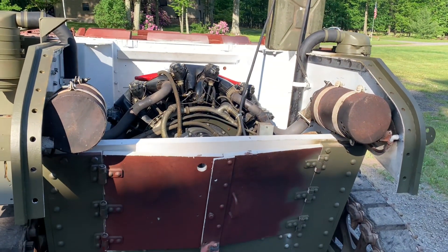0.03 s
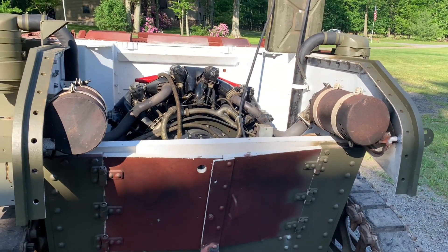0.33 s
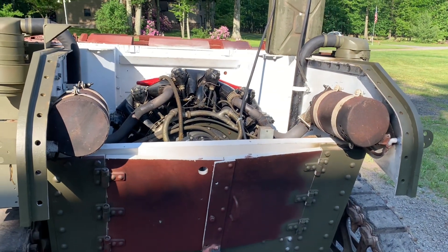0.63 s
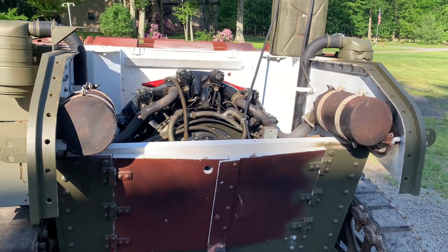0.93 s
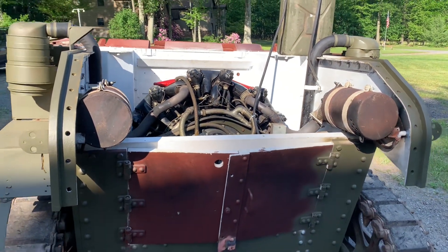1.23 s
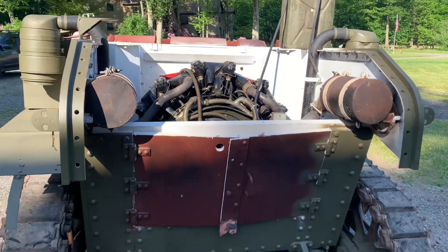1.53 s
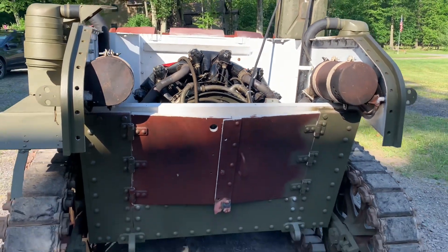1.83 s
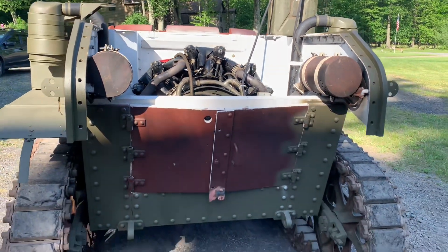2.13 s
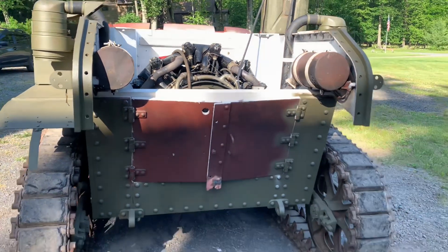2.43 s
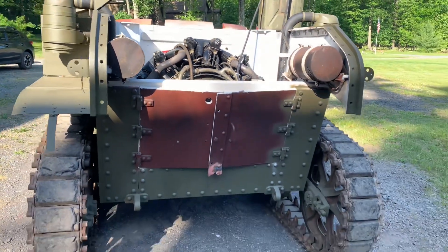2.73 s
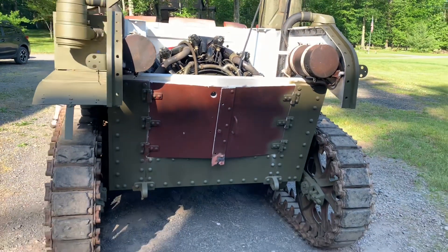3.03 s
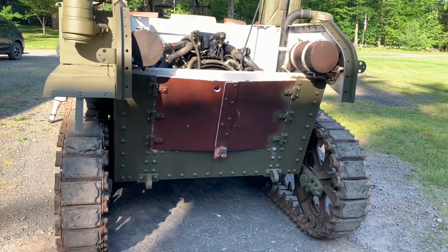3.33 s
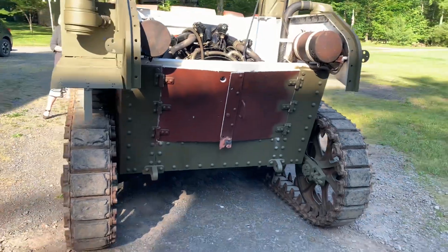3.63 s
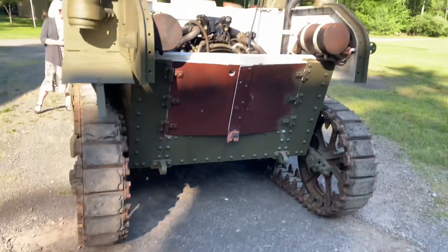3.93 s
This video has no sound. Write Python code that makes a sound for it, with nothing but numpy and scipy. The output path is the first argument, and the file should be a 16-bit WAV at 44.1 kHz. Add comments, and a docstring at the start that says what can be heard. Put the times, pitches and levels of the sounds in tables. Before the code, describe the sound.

A tank engine idles outdoors for four seconds, with a low, loping exhaust thump, a gassy rasp and hissing, ticking valves. Loose metal clinks and pings lightly throughout. At about 1.1 seconds the idle drops slightly, then holds steady. A few sharp little snaps come between 1 and 2.8 seconds. As the microphone backs away over gravel, the rasp and ticking soften while the low throb stays strong.

```python
"""A loping thump and bark of unequal exhaust pulses: a tank's seven-cylinder radial engine idles in its bay.
Gas rasps after each firing, the valve gear ticks, hisses and snaps, loose metal clinks and pings.
The idle drops after a second. The listener backs slowly away over gravel, so the bounce off the ground
trails the direct sound less and less and shifts the colour."""
import sys
import numpy as np
from scipy import signal
from scipy.fft import rfft, irfft
from scipy.io import wavfile
from scipy.ndimage import uniform_filter1d, minimum_filter1d, map_coordinates

SR = 44100
rng = np.random.default_rng(int(sys.argv[2]) if len(sys.argv) > 2 else 0)


def store_wav(level_fs):
    """Save 16-bit WAV to argv[1]."""
    pcm = np.round(np.clip(np.atleast_2d(level_fs), -1, 1) * 32767)
    wavfile.write(sys.argv[1], SR, pcm.T.astype(np.int16))


N = 176400
TIME = np.arange(N) / SR


def undb(db):
    """Decibels to gain."""
    return 10 ** (np.asarray(db) / 20)


def unit(x):
    """Scale to rms 1."""
    return x / np.sqrt(np.mean(x ** 2))


def curve(table, column=1):
    """One column of a time table as an automation curve."""
    rows = np.array(table, float)
    return np.interp(TIME, rows[:, 0], rows[:, column])


def colour(x, points):
    """Minimum-phase EQ through (frequency [Hz], gain [dB]) points."""
    rows, size = np.array(points, float), 2 * N
    hz = np.maximum(np.arange(N + 1) * SR / size, 1)
    db = np.interp(np.log(hz), np.log(rows[:, 0]), rows[:, 1])
    cepstrum = irfft(np.log(undb(db)))
    cepstrum[1:N] *= 2
    cepstrum[N + 1:] = 0
    return irfft(rfft(x, size) * np.exp(rfft(cepstrum)))[..., :N]


def band_unit(x, lo_hz, hi_hz):
    """Scale so that the centre of the stereo image has rms 1 within a band."""
    band = signal.butter(4, [lo_hz, hi_hz], "band", fs=SR, output="sos")
    return x / np.std(signal.sosfilt(band, x.mean(axis=0)))


def ring(x, hz, width_hz, skirt_hz):
    """A narrow resonance, its skirts trimmed by a wider one; gain 1 at the centre."""
    for width in (width_hz, skirt_hz):
        x = signal.lfilter(*signal.iirpeak(hz, hz / width, fs=SR), x)
    return x


def decay(x, seconds):
    """Give every impulse an exponential tail."""
    return signal.lfilter([1], [1, -np.exp(-1 / (seconds * SR))], x)


def delay(x, ms):
    """Delay by a fixed or moving time."""
    return map_coordinates(x, [np.arange(N) - ms * SR / 1000], order=3, mode="mirror")


def place(x, lead_ms, pan_db):
    """Pan by time and level; positive values pull left."""
    return np.array([x * undb(pan_db / 2), delay(x, lead_ms) * undb(-pan_db / 2)])


def flicker(per_s, depth_db):
    """A gain that wavers at random around 1."""
    hold = int(SR / per_s)
    steps = np.repeat(rng.standard_normal(N // hold + 2), hold)
    return undb(depth_db * unit(uniform_filter1d(steps, hold)[:N]))


def impulses(times, sizes):
    """Impulses shared between neighbouring samples."""
    keep = (times > 0) & (times < (N - 2) / SR)
    at, sizes = times[keep] * SR, sizes[keep]
    i = at.astype(int)
    return np.bincount(i, sizes * (1 - at + i), N) + np.bincount(i + 1, sizes * (at - i), N)


def random_hits(per_s, spread_db, max_db):
    """Impulses at random times, most soft and a few hard."""
    struck = rng.random(N) < per_s / SR
    return struck * undb(np.minimum(spread_db * rng.exponential(size=N), max_db))


# Looseness of the engine's timing (time [s], spread [ms])
TIMING_SLOP = [(0, 0.79), (1.1, 0.59), (1.4, 0.25), (4, 0.16)]
def strokes(crank, lag, db, scatter_db):
    """One hit each engine cycle, lag firing intervals in, a little uneven in time and strength."""
    cycles = np.arange(40)
    slip, accent = rng.standard_normal((len(cycles), 2)).T
    times = np.interp(lag + len(FIRING_ORDER) * cycles, crank, TIME, left=-1, right=-1)
    spread_s = np.interp(times, TIME, curve(TIMING_SLOP)) / 1000
    return impulses(times + spread_s * slip, undb(db + scatter_db * accent))


# The lope, one row a cylinder (thump lag [firing intervals], thump level [dB],
# bark lag [firing intervals], bark level [dB], bark trim at fast idle [dB])
FIRING_ORDER = [(.25, -2.5, 0.2, -4, 1.5), (1.24, -0.5, 1.23, -3, -1.5), (2.25, -0.5, 2.5, -8, -1),
                (3.53, 0.5, 3.5, -2, -1.5), (4.35, -1.5, 4, -2.5, 1), (5.27, -3, 5.5, 0, -7.5),
                (6.42, -3.5, 6.5, -1, -2)]
# Crossfade out of the fast idle as the engine settles (time [s], share [0-1])
FAST_IDLE_MIX = [(1.05, 1), (1.2, 0)]
def firings(crank, scatter_db=2.5):
    """Each cylinder triggers a thump and a bark with its own timing and weight, so the idle lopes."""
    fast = curve(FAST_IDLE_MIX)
    thumps = sum(strokes(crank, lag, db, scatter_db) for lag, db, *_ in FIRING_ORDER)
    barks = sum(strokes(crank, lag, db, scatter_db) * undb(trim_db * fast)
                for _, _, lag, db, trim_db in FIRING_ORDER)
    return thumps, barks


# Lag of the ground bounce as the listener backs away (time [s], delay [ms])
GROUND_DELAY = [(0, 5.42), (1, 5.33), (1.8, 4.625), (2.5, 4.17), (3.2, 3.76), (4, 3.39)]
def ground(x, bounce):
    """Direct sound plus its bounce off the gravel: a slowly sweeping comb filter."""
    return x + bounce * delay(x, curve(GROUND_DELAY))


# Tone of a thump through the mufflers (frequency [Hz], gain [dB])
MUFFLER_EQ = [(10, -53), (25, -31.5), (45, -14.5), (70, 1), (100, 7), (150, 0), (220, -7), (300, -13),
              (430, -12.5), (600, -28.5), (1000, -46.5), (2500, -61), (9000, -110)]
# Fader rides as the listener moves (time [s], boom [dB], pipes [dB], rasp and clinks [dB])
FADERS = [(0, -14, -15, -26), (.3, -14.5, -16, -27), (.78, -14.5, -15.5, -26.5), (1.0, -16.5, -15.5, -28.5),
          (1.2, -16, -14.5, -27.5), (1.7, -14, -12.5, -27), (2.2, -15, -13.5, -29.5), (2.65, -14, -15, -30),
          (2.92, -16.5, -14.5, -31.5), (3.25, -15, -16, -31), (4, -14.5, -16, -32)]
# Balance of the exhaust (time [s], left minus right [dB])
EXHAUST_BALANCE = [(0, -1.6), (4, -2.5)]
def exhaust(crank, thumps, barks):
    """Pulses thump through the mufflers and ring two pipe resonances; the firing rate booms beneath."""
    high, low = (unit(ring(barks, hz, width_hz=55, skirt_hz=hz)) for hz in (256, 190))
    low_db = -1.5 + 9 * curve(FAST_IDLE_MIX)  # the low resonance takes over at fast idle
    bark = undb(-7.5) * unit(high + undb(low_db) * low)
    thump = unit(colour(thumps, MUFFLER_EQ))
    pipes = ground(-thump - bark, bounce=0.52)
    pipes = band_unit(pipes[None], lo_hz=74, hi_hz=477)[0] * undb(curve(FADERS, column=2))
    boom = unit(np.cos(2 * np.pi * crank)) * undb(curve(FADERS, column=1) + 1)
    return place(pipes + boom, lead_ms=0.26, pan_db=curve(EXHAUST_BALANCE))


# Tone of the rushing gas (frequency [Hz], gain [dB])
GAS_EQ = [(15, -13), (60, 16), (150, 7.5), (350, 4.5), (520, 2), (720, 0), (960, -2), (1300, -7),
          (1800, -10), (2300, -8.5), (2750, -14), (3500, -15.5), (4500, -20.5), (7000, -45)]
def rasp(barks, fan_floor=7):
    """Turbulent gas puffs after each firing, over the rush of the cooling fan; part arrives diffusely."""
    puffs = unit(decay(barks, seconds=0.006))
    envelope = (fan_floor + puffs) * flicker(per_s=24, depth_db=.35)
    noise = rng.standard_normal((3, N)) * envelope
    direct = place(ground(noise[0], bounce=.3), lead_ms=0.2, pan_db=5)  # gravel scatters the higher sound
    diffuse = .55 * colour(noise[1:], [(150, -12), (500, -0.5), (1200, 6)])
    gas = band_unit(colour(direct + diffuse, GAS_EQ), lo_hz=622, hi_hz=2490)
    return gas * undb(curve(FADERS, column=3) + 1)


# Bright tone of the valve gear (frequency [Hz], gain [dB])
VALVE_EQ = [(1000, -13), (2700, -5.5), (4000, -5.5), (5000, -5), (6000, -1), (7000, -10), (8200, 3.5),
            (9100, 0), (10000, 1), (11500, -5.5), (12500, -8), (14000, -7), (15200, -16)]
# Fader ride on its sizzle (time [s], level [dB])
SIZZLE_FADER = [(0, -32), (.75, -32.3), (1.05, -33.8), (1.7, -32.5), (2.3, -33.5), (2.75, -34.3),
                (2.92, -36.3), (3.3, -35.8), (3.7, -34.8), (4, -36)]
def valve_gear(crank, lag=0.61, swell_s=0.0043, hiss_floor=1.05, loud_tappet_db=8.5):
    """Rockers sizzle once a firing, with fine ticks and a few snaps; the third tappet stands out."""
    hits = sum(strokes(crank, k + lag, loud_tappet_db * (k == 2), scatter_db=2)
               for k in range(len(FIRING_ORDER)))
    swells = unit(decay(decay(hits, swell_s), swell_s))
    envelope = (hiss_floor + .5 * swells) * flicker(per_s=16, depth_db=.7)
    noise = rng.standard_normal((3, N))
    ticks = random_hits(per_s=1300, spread_db=6, max_db=36)
    grain = np.hypot(1, undb(-14) * unit(decay(ticks, seconds=0.0011)))
    sizzle = unit(envelope * grain) * undb(curve(SIZZLE_FADER) - 1)
    air = place(noise[0], lead_ms=-.217, pan_db=.3) + .22 * noise[1:]  # direct plus diffuse
    hiss = band_unit(colour(air, VALVE_EQ), lo_hz=2980, hi_hz=14300)
    return hiss * np.hypot(sizzle, valve_snaps())


# Modes of the rocker boxes and pipework (frequency [Hz], level [dB], width [Hz])
METAL_MODES = [(860, 4, 70), (950, 7, 50), (1220, 1, 25), (1500, -2, 35), (1700, -4, 40), (2062, -1.5, 20),
               (2240, -.5, 35), (2380, -.5, 35), (2540, -3, 30), (3000, -11, 60), (3560, -6.5, 50),
               (3850, -5, 90), (4080, -4, 90)]
def clinks(crank, busiest_lag=5):
    """Loose metal chatters at random, most busily at one place in each engine cycle."""
    per_s = 40 * (1 + 0.66 * np.cos(2 * np.pi * (crank - busiest_lag) / len(FIRING_ORDER)))
    metal = 0
    for hz, db, width_hz in METAL_MODES:
        knocks = random_hits(per_s, spread_db=3, max_db=9)
        metal += undb(db) * unit(ring(knocks, hz, width_hz, skirt_hz=hz / 4))
    return unit(engine_bay(metal)) * undb(curve(FADERS, column=3) - 7)


def engine_bay(x, t60_s=0.024, wet_db=-0.5):
    """Direct sound plus dense short reflections between the steel walls, different for each ear."""
    t = TIME[:SR // 5]
    tails = rng.standard_normal((2, len(t))) * np.exp(-np.log(1000) * t / t60_s)
    walls = np.array([signal.fftconvolve(x, tail / np.linalg.norm(tail))[:N] for tail in tails])
    return place(x, lead_ms=.08, pan_db=.3) + undb(wet_db) * walls


# Accents on the metalwork (time [s], strength [dB], centre of the modes struck [Hz])
HARD_KNOCKS = [(.194, -25, 1750), (.349, -25, 1700), (.569, -22, 1500), (.909, -24, 1500),
               (1.314, -22, 1650), (1.841, -20, 2060), (1.968, -19, 2250), (2.097, -26, 1900),
               (2.357, -25, 1640), (2.62, -25, 2100), (2.719, -27, 2150), (3.182, -28, 1520),
               (3.641, -29, 1600)]
def pings(reach_octaves=.25):
    """Harder knocks ring the same metal; where each lands decides which modes speak."""
    times, db, centre_hz = np.array(HARD_KNOCKS).T
    shares = np.array([undb(mode_db) * np.exp(-(np.log2(hz / centre_hz) / reach_octaves) ** 2)
                       for hz, mode_db, _ in METAL_MODES])
    sizes = shares / np.linalg.norm(shares, axis=0) * undb(db)
    metal = 0
    for size, (hz, _, width_hz) in zip(sizes, METAL_MODES):
        makeup = SR / (2 * np.pi * width_hz)  # a narrow mode takes little from one impulse
        metal += makeup * ring(impulses(times, size), hz, width_hz, skirt_hz=hz / 4)
    return engine_bay(metal)


# Sharp accents in the valve gear (time [s], strength [dB])
SNAP_CUES = [(1.134, -26), (1.4735, -22), (1.6647, -21), (1.737, -17), (2.3126, -20), (2.7721, -17)]
def valve_snaps():
    """The valve gear snaps: an envelope that kicks its hiss open and dies at once."""
    times, db = np.array(SNAP_CUES).T
    return decay(impulses(times, undb(db - 7)), seconds=.003)


# Tempo of the idle (time [s], firing rate [Hz])
FIRING_RATE = [(0.0, 55.46), (0.25, 59.01), (0.5, 57.61), (0.78, 58.93), (1.08, 57.7), (1.2, 52.14),
               (1.65, 53.57), (2.5, 54.36), (3.2, 54.33), (4.0, 55.56)]
def scene():
    """The crank drives exhaust, gas and valve gear; the metalwork chatters along."""
    crank = np.cumsum(curve(FIRING_RATE)) / SR  # position in firing intervals
    thumps, barks = firings(crank)
    return exhaust(crank, thumps, barks) + rasp(barks) + valve_gear(crank) + clinks(crank) + pings()


def record(dry):
    """A fast limiter holds the highest peaks; a steep low-pass cuts the top."""
    ceiling, window, top_hz = .94, SR // 100, 15400
    peaks = np.maximum(np.abs(dry).max(axis=0), 1e-6)
    gain = uniform_filter1d(minimum_filter1d(np.minimum(1, ceiling / peaks), window), window)
    fade_in = np.minimum(np.arange(N) / 100, 1)
    return signal.sosfilt(signal.ellip(8, .2, 70, top_hz, fs=SR, output="sos"), dry * gain * fade_in)


dry = scene()
out = record(dry)
store_wav(out)
```